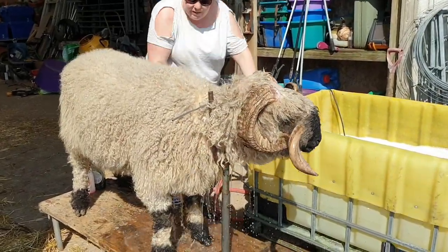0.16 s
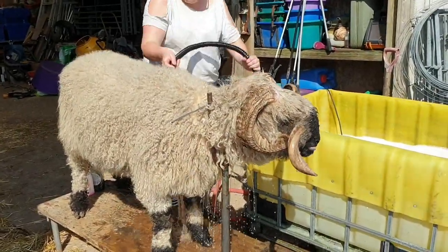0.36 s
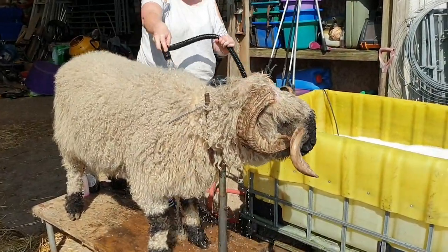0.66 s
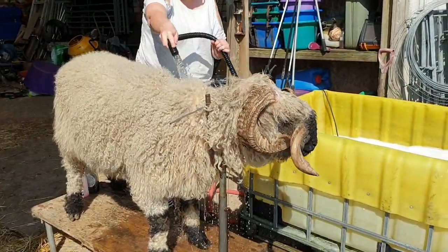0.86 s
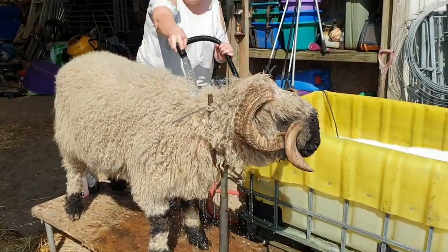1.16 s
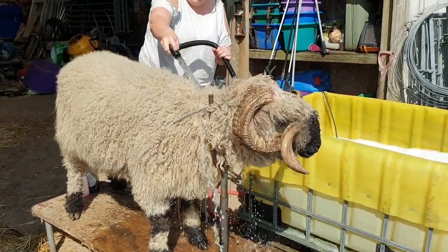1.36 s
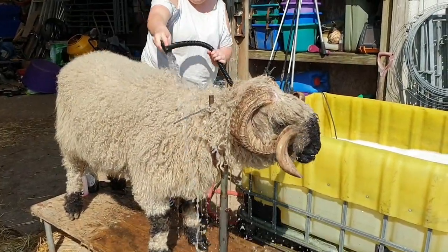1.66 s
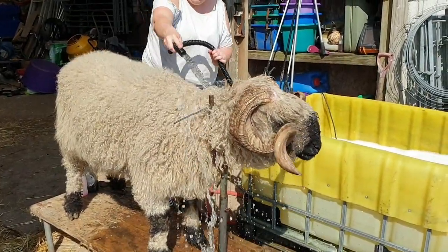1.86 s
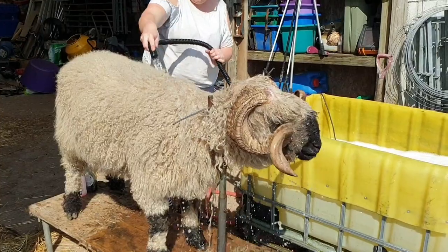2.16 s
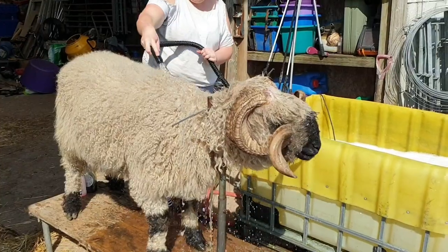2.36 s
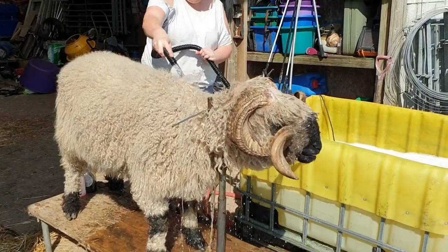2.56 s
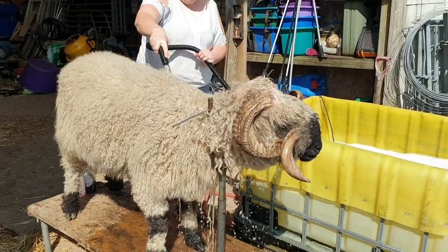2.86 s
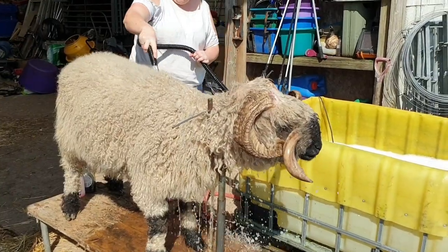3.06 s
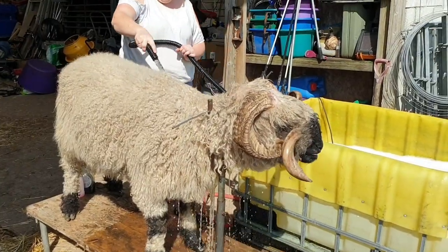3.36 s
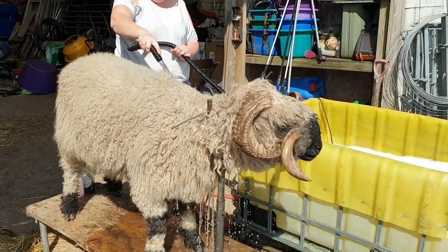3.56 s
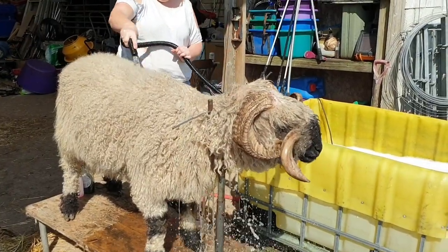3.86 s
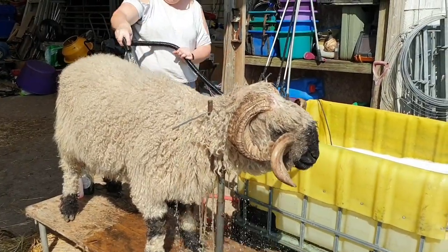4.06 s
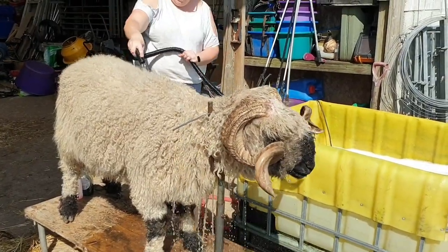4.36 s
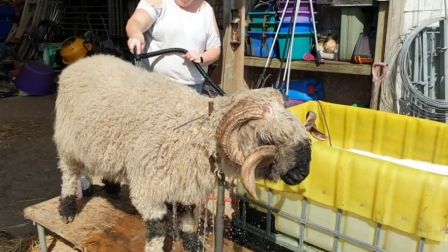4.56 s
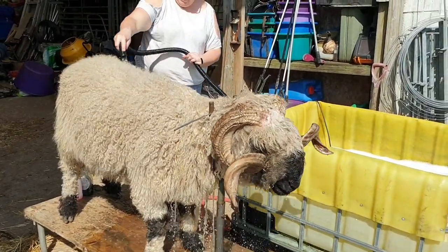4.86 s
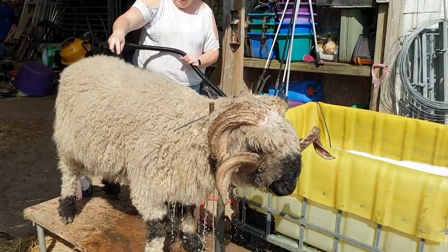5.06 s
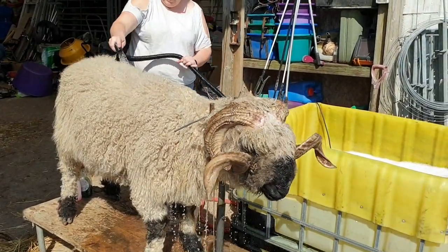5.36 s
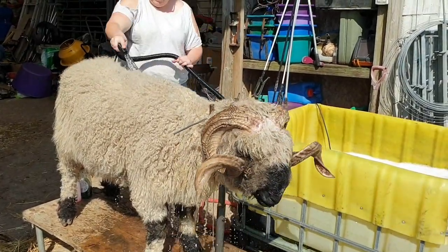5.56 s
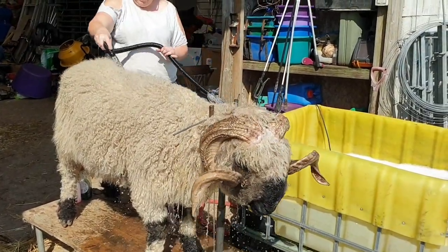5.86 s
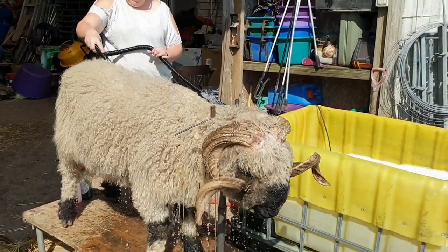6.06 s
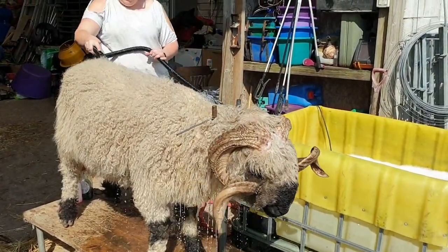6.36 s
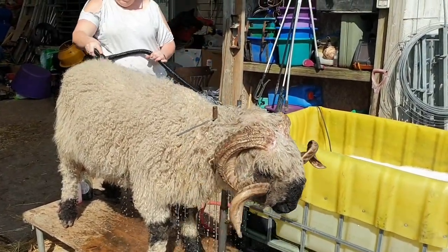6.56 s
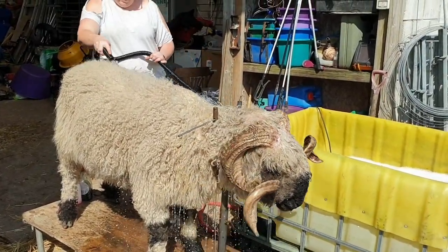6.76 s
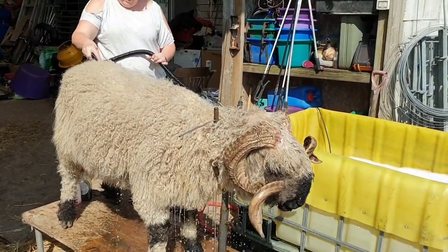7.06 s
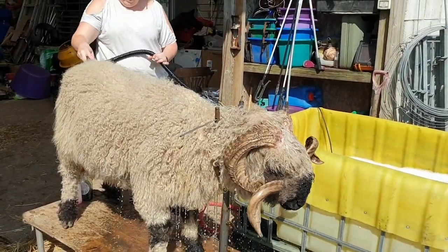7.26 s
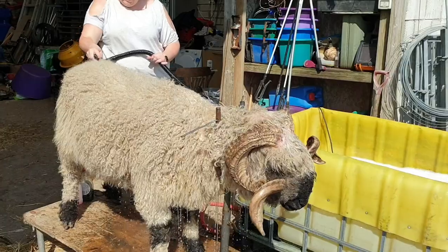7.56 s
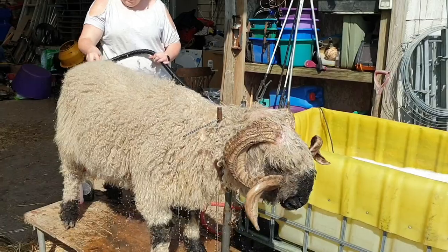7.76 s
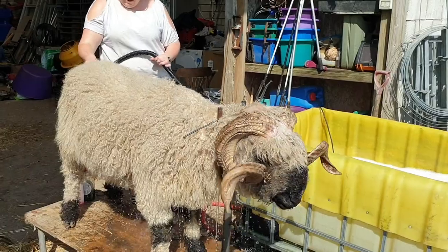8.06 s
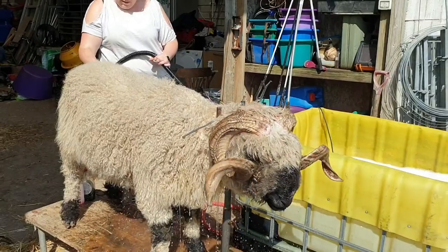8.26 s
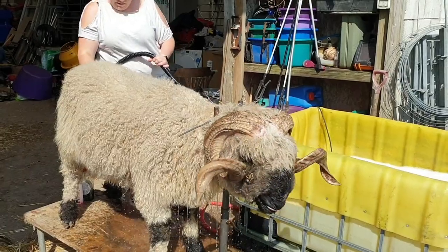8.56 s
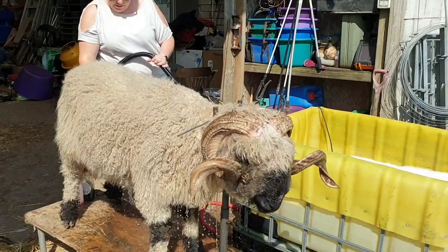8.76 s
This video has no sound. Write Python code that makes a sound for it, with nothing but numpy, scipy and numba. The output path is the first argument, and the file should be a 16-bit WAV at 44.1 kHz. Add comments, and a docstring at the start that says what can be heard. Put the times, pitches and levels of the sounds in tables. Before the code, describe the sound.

Outdoors in a farmyard, hose water drains from a sheep's wet fleece onto a wooden stand and the ground. From 0 s there is a constant, irregular patter of tiny bright drops, with crisp clicks, short upward bubble chirps and a soft fine hiss beneath. A stronger splat lands near 0.4 s; a heavy slap at 1.7 s begins a dense cluster of splashes lasting to about 2.5 s. It thins, then swells again from 3.7 to 4.1 s, with a sharp smack near 4.55 s. Dribbling continues, sparser around 6 to 6.7 s, busier at 7 to 7.4 s and around 8.1 s. Dull low plops hit the boards throughout. Low wind thumps buffet the microphone from about 5 to 6.4 s and hardest from 7.5 to 8.1 s, then drop to small bumps. Nearby walls add brief reflections; a faint dull distant murmur remains to 9 s.

```python
"""Hose water falling from wet wool

Water runs off wet wool and falls in clumps on a wooden table and the ground, in a yard.
Drops sound as short bubble tones that chirp upward; clumps slap, chirp low or click near 5 kHz, and spatter.
A fine spray hisses beneath, as filtered noise, and near walls answer the drops with short noise tails.
Wind noise buffets the two microphone ports separately, over a dull far-off yard murmur."""
import sys
import numpy as np
from scipy import signal
from scipy.fft import rfft, irfft, next_fast_len
from scipy.io import wavfile
from scipy.ndimage import uniform_filter1d, map_coordinates
from numba import njit

SR = 44100
rng = np.random.default_rng(int(sys.argv[2]) if len(sys.argv) > 2 else 0)


def transcribe(u):
    """Save the signal u as a 16-bit wav file named by the first command-line argument.

    u: samples, shape (n,) or (channels, n), limited to [-1, 1]; the rate is SR.
    q: integer samples, one column per channel.
    """
    v = np.clip(np.atleast_2d(u).T, -1, 1)
    q = np.round(v * 32767).astype(np.int16)
    wavfile.write(sys.argv[1], SR, q)


def ratio(d):
    """dB to gain"""
    e = np.asarray(d, float) / 20
    return 10 ** e


N = 393358


def unit(x):
    """Power normalisation: scales a signal to rms 1."""
    return x / np.sqrt(np.mean(x ** 2) + 1e-20)


def along(points, hz):
    """Logarithmic frequency scale: interpolates (frequency [Hz], value) points along it."""
    f, v = np.transpose(points)
    return np.interp(np.log(hz + 1), np.log(f + 1), v)


def curves(rows):
    """Piecewise-linear envelopes: one value per sample for each column after the time."""
    s, *columns = np.transpose(rows)
    time_s = np.arange(N) / SR
    return [np.interp(time_s, s, column) for column in columns]


def wobble(rate):
    """Slow random modulation: a smooth curve through random knots, rate of them a second."""
    knots = rng.standard_normal(int(N * rate / SR) + 4)
    return map_coordinates(knots, [np.arange(N) * rate / SR])


def sides(pan_db):
    """Level difference between channels: left and right gains, split evenly."""
    return ratio(np.array([pan_db, -pan_db]) / 2)


def coloured(x, spectrum):
    """Minimum-phase filtering: the cepstrum is folded to make the spectrum causal."""
    m = 2 * next_fast_len(N // 2 + 4096)
    gain = ratio(along(spectrum, np.fft.rfftfreq(m, 1 / SR)))
    cepstrum = irfft(np.log(gain + 1e-6), m)
    cepstrum[1:m // 2] *= 2
    cepstrum[m // 2 + 1:] = 0
    return irfft(rfft(x, m) * np.exp(rfft(cepstrum)), m)[..., :N]


def rush(spectrum, alike, patchy_db):
    """Partly coherent noise: stereo, rms 1, with random gain patches in time and frequency."""
    z = signal.stft(rng.standard_normal((2, N + 512)), nperseg=256)[2]
    patches = uniform_filter1d(rng.standard_normal(z.shape[1:]), size=5, axis=0)
    patches = uniform_filter1d(patches, size=6, axis=1)
    noise = signal.istft(z * ratio(patchy_db * unit(patches)), nperseg=256)[1]
    pair = rfft(noise[:, :N])
    # The mid-side mixing angle sets the likeness of left and right
    angle = np.arccos(np.clip(along(alike, np.fft.rfftfreq(N, 1 / SR)), -1, 1)) / 2
    mid, side = irfft(pair * [np.cos(angle), np.sin(angle)], N)
    return unit(coloured(np.array([mid + side, mid - side]), spectrum))


@njit
def add(out, start, hz, gain, cycles, rise, soft, rate):
    """Damped resonance: short tones that glide upward by their share of rise and stop fast."""
    for g in range(len(start)):
        life = cycles[g] / hz[g]
        first = int(start[g] * rate) + 1
        for n in range(max(first, 0), min(first + int(2.5 * life * rate), len(out))):
            t = n / rate - start[g]
            turns = hz[g] * t * (1 + rise[g] * (t / life / 2 - .5))
            onset = 1 - np.exp(-t * hz[g] / soft)
            out[n] += gain[g] * np.sin(2 * np.pi * turns) * np.exp(-(t / life) ** 2) * onset


def tones(s, hz, db, cycles, rise, pan_db, spread_s):
    """Arrival-time difference: each tone has its own spot, so its own lag between ports, leaning left."""
    out = np.zeros((2, N))
    lag_s = -.00003 + spread_s * rng.uniform(-1.06, 1, len(s))
    for ear, sign in enumerate((1, -1)):
        gain = ratio(db + sign * pan_db / 2)
        add(out[ear], s + sign * lag_s / 2, hz, gain, cycles + 0 * s, rise + 0 * s, 1.3, float(SR))
    return out


# Murmur of the yard: (time [s], relative level [dB])
MURMUR_LEVEL = [(0.0, -53.5), (0.82, -56), (1.19, -53), (1.44, -55), (1.89, -55), (2.53, -57),
                (2.75, -57.5), (3.0, -55.5), (3.18, -53.5), (3.55, -59), (3.77, -56), (3.97, -51.5),
                (4.22, -55.5), (4.47, -55.5), (4.89, -55.5), (6.36, -57), (7.35, -53.5), (7.45, -55.5),
                (7.85, -54), (8.37, -59), (8.6, -59), (8.77, -55.5), (8.92, -56.5)]
# Murmur spectrum: (frequency [Hz], relative level per hertz [dB])
MURMUR_COLOUR = [(35, -22), (60, -21), (101, -5), (179, -8.5), (290, 2), (380, -7.5), (440, -9.5), (642, 2),
                 (949, -10), (1370, -16), (1500, -12), (1950, -34), (3300, -120)]
# Left-right likeness of murmur, wall tails and spray: (frequency [Hz], coherence [-1 to 1])
LIKENESS = [(60, 0.92), (150, 1), (380, 1), (950, 0.63), (2380, -0.23), (5980, -0.31), (15000, -0.14)]


def murmur():
    """Coherence of distant sources: far traffic and leaves, nearly the same at both ports in the bass."""
    level_db, = curves(MURMUR_LEVEL)
    drift_db = 0.37 * wobble(4)
    return ratio(level_db + 2.0 + drift_db) * rush(MURMUR_COLOUR, LIKENESS, patchy_db=2.0)


# Wind at the ports:
# (time [s], relative buffet level [dB], relative upper flutter level over buffet [dB], left-right [dB])
GUSTS = [(0.0, -67, 8, -9.0), (0.07, -62, 1, 0.0), (0.22, -57, 3, -1), (0.25, -48, -1, 2),
         (0.42, -60.5, 7, 2), (0.79, -51, -6, 3.5), (0.89, -64, 5.5, -1.5), (1.32, -63, 4, 1.0),
         (1.84, -62, -2, -16), (1.94, -68, 6, -3), (2.06, -58, -11, -18), (2.13, -66, 5, -15.0),
         (2.21, -47, -17.5, 1), (2.26, -61, -3, -16.0), (2.31, -56, -6, -16.0), (2.38, -48, -11.5, 3),
         (2.53, -51.5, -7, 0), (2.68, -64, 1.5, 12.5), (2.8, -62, 1, -11.0), (3.15, -55, -4, 3),
         (3.75, -64, 3, 0), (4.22, -61, 8, 1), (4.27, -63.5, 1, -15.5), (4.47, -62.5, 2, 14),
         (4.65, -73, 5, -18), (4.72, -46.5, -6, -17), (4.77, -49, -9, -24), (4.82, -60, -1, -25),
         (4.87, -52, -13, -2), (4.99, -52, 10, 6), (5.04, -58, -9, -16.0), (5.09, -44, 1, 1),
         (5.17, -45, -4, -2), (5.34, -33.5, -20, 2), (5.39, -53, -9.5, -9), (5.49, -45, -10, -3.0),
         (5.51, -38, -18, 2), (5.56, -41.5, -10, 2), (5.61, -53, -8, -19), (5.66, -49, -14.5, -14.0),
         (5.71, -49.5, 2, -3), (5.76, -37, -13, -4.0), (5.81, -51, 2, 2.5), (5.84, -34, -18, -3.5),
         (5.94, -42, -4, -0.5), (5.96, -47, -4, -5.5), (6.01, -31, -12, -5), (6.06, -50, -1, 1.0),
         (6.11, -37, -7, -4), (6.21, -42, -13, 7), (6.23, -42.5, -13, -3), (6.31, -44, -10, -1.0),
         (6.36, -53.5, -8, -13.0), (6.41, -36.5, -12, 0.5), (6.48, -65, 7, -4), (6.53, -58, -1, -16),
         (6.63, -64.5, 3, -14), (6.78, -56, 4, 1), (6.86, -64, -3, -28.0), (6.95, -42, -14, -1),
         (6.98, -50, -7, 1), (7.05, -42, -10, -2), (7.18, -59, -2.5, -19), (7.23, -51, 3, 0.5),
         (7.33, -47.5, -5, 5.0), (7.43, -53, -3, -25), (7.45, -42, -5, -0.5), (7.5, -41.5, -6, 1),
         (7.53, -24, -17, -1), (7.57, -44, -7, -3), (7.62, -31, -18, 14), (7.67, -31.5, 1, 3),
         (7.7, -35, -9, -9.0), (7.77, -36.5, -17, -7), (7.8, -39, -15, -3), (7.87, -28, -16, 7),
         (7.9, -29, -8, 5), (7.95, -27.5, -9, 12), (8.0, -31, -12, 1), (8.05, -34.5, -23, 22),
         (8.1, -34, -3, 25.0), (8.12, -68, -2, 1), (8.17, -60, -2, -11), (8.52, -66, -11, -20.5),
         (8.6, -47, 2, -4.5), (8.64, -44, -7, -11.5), (8.69, -62, -9, -28.0), (8.74, -71, 3, -20.5),
         (8.82, -40, -16, 1.5), (8.87, -55, -10, -22), (8.92, -44.5, -8, -4.5)]
# Buffet spectrum: (frequency [Hz], relative level per hertz [dB])
BUFFET_COLOUR = [(12, -65), (20, -7), (53, 1), (70, 1), (103, -1.5), (151, -12), (250, -18.5), (320, -53),
                 (550, -120)]
# Flutter spectrum: (frequency [Hz], relative level per hertz [dB])
FLUTTER_COLOUR = [(76, -25.5), (130, -6.5), (182, -5.5), (290, -10), (551, -25.5), (700, -26), (910, -22),
                  (1540, -120)]
# Single eddies striking a port: (time [s], relative level [dB], frequency [Hz], left-right [dB])
EDDIES = [(4.726, -42, 104, -26.5), (5.229, -33, 61.9, -5), (5.282, -35, 64.6, -1.0), (5.329, -34, 88.8, 4),
          (5.501, -26, 61.9, 4), (5.544, -36, 61.9, 1.5), (5.733, -27, 67.3, -3.5), (5.799, -32, 188, 4),
          (5.831, -36, 107, -3.0), (5.986, -22.5, 91.5, -4.0), (6.109, -33, 127, 2),
          (6.159, -31.5, 113, 1.0), (6.189, -30, 61.9, 3.5), (6.382, -30, 61.9, -2.5),
          (7.016, -31, 61.9, -2), (7.464, -29, 86.1, 2.5), (7.515, -23, 61.9, 5), (7.584, -34, 61.9, 6),
          (7.61, -17, 61.9, 17.5), (7.658, -26, 178, 1), (7.874, -22, 64.6, 4.5), (7.939, -29, 80.7, 11.0),
          (7.974, -24, 61.9, 4.5), (8.024, -26, 67.3, 20.5), (8.079, -23, 80.7, 25)]


def wind():
    """Turbulent pressure: eddies roll over each port separately; strong ones flutter, single ones thump."""
    buffet_db, flutter_db, pan_db = curves(GUSTS)
    low = rush(BUFFET_COLOUR, [(30, 0.3)], patchy_db=2.0)
    low_power = np.abs(uniform_filter1d(low ** 2, size=2500, axis=1))
    buffet = unit(low / (low_power + .05) ** 0.41)  # evens out the swings in loudness
    flutter = unit(np.abs(buffet) ** 1.45 * rush(FLUTTER_COLOUR, [(30, 0.093)], patchy_db=3.5))
    s, db, hz, side_db = np.transpose(EDDIES)
    # About one pressure cycle each, with a wide lag between the ports
    thumps = tones(s, hz, db + 5.0, 1.0, 0.16, side_db, spread_s=0.0078)
    return thumps + sides(pan_db) * ratio(buffet_db + 0.65) * (buffet + ratio(flutter_db - 4.0) * flutter)


# Decay of the shed front and tank side: (frequency [Hz], time to fall 60 dB [s])
WALL_DECAY = [(300, 0.15), (2000, 0.12), (5000, 0.05), (12000, 0.068)]


def yard_walls(x, size=SR // 4):
    """Reverberation: near walls add a short noise tail, redrawn each quarter second so no ringing builds up."""
    out = np.pad(x, ((0, 0), (0, 2 * size)))
    delay = 80  # samples
    for start in range(0, N, size):
        hz, t, z = signal.stft(rng.standard_normal((2, size)), SR, nperseg=128)
        angle = np.arccos(np.clip(along(LIKENESS, hz), -1, 1))[:, None] / 2
        decay = ratio(-60 * t / along(WALL_DECAY, hz)[:, None])
        mid, side = z * [np.cos(angle), np.sin(angle)] * decay
        tail = signal.istft(np.array([mid + side, mid - side]), SR, nperseg=128)[1][:, :size - delay]
        tail = tail / np.linalg.norm(tail[0])
        answer = signal.fftconvolve(x[:, start:start + size], tail, axes=1)
        out[:, start + delay:][:, :answer.shape[1]] += ratio(-7.0) * answer
    return out[:, :N]


# Fine spray: (time [s], relative level [dB])
SPRAY_LEVEL = [(0.0, -46), (0.4, -48), (0.79, -45), (1.07, -48.5), (1.54, -49.5), (1.84, -46.5),
               (1.91, -55), (2.16, -46), (2.78, -52.5), (2.95, -52), (3.18, -42.5), (3.38, -49),
               (3.58, -56.5), (3.75, -42), (3.87, -39), (3.95, -40.5), (4.12, -44.5), (4.37, -48),
               (4.84, -44.5), (5.14, -47), (5.29, -50.5), (5.54, -44.5), (5.89, -51), (6.16, -46),
               (6.51, -48), (6.93, -48), (7.28, -42), (7.43, -45.5), (7.65, -45), (7.8, -43.5), (8.05, -42),
               (8.3, -47.5), (8.55, -45.5), (8.77, -47.5), (8.92, -41)]
# Spray spectrum: (frequency [Hz], relative level per hertz [dB])
SPRAY_COLOUR = [(530, -28), (900, -18.5), (1370, -19.5), (1570, -10), (2300, -7.5), (2860, -8), (3510, -14),
                (5350, 4), (5750, 0.5), (6330, -19.5), (8550, -7), (9650, -15.5), (11400, -9), (14900, -18),
                (16000, -26)]


def spray(water):
    """Noise of countless droplets: a fine hiss of mist, swelling a little with every clump that lands."""
    level_db, = curves(SPRAY_LEVEL)
    power = np.sum(water ** 2, axis=0)
    brief = np.abs(uniform_filter1d(power, size=500)) + 1e-7
    usual = np.abs(uniform_filter1d(power, size=12000)) + 1e-7
    swell = (brief / usual) ** 0.096
    return ratio(level_db + 7.5 + 0.68 * wobble(24)) * swell * rush(SPRAY_COLOUR, LIKENESS, patchy_db=2.5)


# Colour of table, yard and microphone on the water: (frequency [Hz], gain [dB])
WATER_COLOUR = [(530, -25), (900, -20), (1230, -9), (1390, -15), (2220, -7), (2860, -7), (3150, -10),
                (3550, -11), (5280, -4), (6410, -16.5), (8550, -12), (9650, -17), (11400, -13.5),
                (14900, -27), (16000, -32)]


def swarm(s, hz, db, pan_db, count, over_s, octaves, cycles):
    """Drop fragmentation: each shatters into count bubbles that crowd in, then thin out and weaken."""
    shape = (len(s), count)
    delay, n, u = rng.gamma(1.6, size=shape), rng.standard_normal(shape), rng.random(shape)
    start_s = s[:, None] + over_s * delay
    pitch = np.clip(hz[:, None] * 2 ** (octaves * n), 400, 15500)
    # Higher tones are shorter; level rises with pitch to keep the swarm's spectrum flat
    level_db = db[:, None] - 2.1 * delay - 7 * u + 20 * np.log10(pitch / hz.mean())
    rows = (start_s, pitch, level_db, cycles * (.5 + u), 0.07 + 0 * u, pan_db[:, None] + 2.4 * n)
    return coloured(tones(*[r.ravel() for r in rows], spread_s=.00011), WATER_COLOUR)


# Heavy drops on the table: (time [s], relative level [dB], frequency [Hz],
# ringing life [cycles], slap level over that level [dB])
HEAVY_DROPS = [(0.248, -37.5, 720, 2.4, -17), (0.502, -31, 487, 2.8, -9), (0.925, -32, 1440, 4.4, -11),
               (0.954, -31.5, 1230, 2.9, -2.5), (1.018, -36.5, 298, 1.7, -1.5), (1.315, -37, 643, 1.9, -3),
               (1.463, -37.5, 1310, 2.4, -7), (1.833, -29.5, 1260, 2.4, -5), (1.912, -34, 376, 2.7, -11),
               (1.968, -40, 390, 2.6, -9), (2.031, -34, 1270, 2.9, 1), (2.101, -30.5, 1490, 4.5, -11),
               (2.81, -44, 680, 2.4, 1), (2.845, -33.5, 1310, 3.3, -4), (2.869, -47, 716, 2, 8),
               (3.038, -38, 780, 2.8, -5), (3.836, -31, 1470, 3.2, -5), (3.899, -39, 623, 2.4, -5),
               (4.646, -38, 674, 2.1, -5), (4.93, -33.5, 560, 2.1, -5), (5.562, -33, 670, 2.1, -1),
               (5.6, -36, 657, 2.1, -1), (6.507, -35.5, 1250, 3.2, -4), (6.745, -38, 1050, 2.9, -8),
               (6.915, -33.5, 729, 1.9, -4), (7.038, -38, 694, 2, 0), (7.709, -33, 1130, 2.4, -4),
               (7.906, -32, 670, 2.5, -0.5), (8.13, -35, 1200, 2.6, -6), (8.343, -40, 1210, 3, -5)]
# Slap spectrum of the wet boards: (frequency [Hz], relative level per hertz [dB])
BOARD_COLOUR = [(120, -17), (250, -10.5), (600, 2), (1500, 1), (2500, 5.5), (5000, -71)]


def plops():
    """Bubble resonance and impact: heavy drops give a low, short gulp and a dull slap on the boards."""
    s, db, hz, cycles, slap_db = np.transpose(HEAVY_DROPS)
    gulp = tones(s, hz, db + 3.0, np.clip(cycles, .3, 12), 0.022, 0 * s, spread_s=.0001)
    envelope, t = np.zeros(N + SR), np.arange(SR // 4) / SR
    for when, level_db in zip(s, db + slap_db):
        decay = ratio(level_db - 60 * t / 0.06)  # falls 60 dB in 0.06 s
        envelope[round(when * SR):][:len(t)] += decay * (1 - np.exp(-t / 0.0014))
    slap = envelope[:N] * unit(coloured(rng.standard_normal(N), BOARD_COLOUR))
    return gulp + slap


def patter(level_db, clumps_db, count, centre_hz, octaves, cycles, size_db, denser):
    """Random arrivals in clumps: more flow is partly more drops (share denser), partly bigger ones."""
    arrivals = np.cumsum(ratio(2 * denser * level_db + clumps_db))
    u, e, n = rng.random(count), rng.exponential(size=count), rng.standard_normal((count, 2))
    s = np.interp(u * arrivals[-1], arrivals, np.arange(N) / SR)
    hz = centre_hz * 2 ** (octaves * n[:, 0])
    drop_db = size_db * np.minimum(e, 3.2)
    drops = swarm(s, hz, drop_db, 1.5 * n[:, 1], count=3, over_s=.002, octaves=0.3506, cycles=cycles)
    # Undo the loudness that density alone brings, then set the level
    return ratio(level_db) * unit(drops * ratio(-denser * level_db))


# Run-off: (time [s], relative level of fine drops [dB], relative level of big drops [dB], left-right [dB])
RUNOFF_FLOW = [(0.0, -42, -46, 1), (0.4, -42, -50, 10), (0.94, -42, -47, 0.5), (1.24, -44, -50, 3),
               (1.51, -44, -52, 0.5), (1.69, -43, -50, 13), (1.79, -41, -45, 2), (2.06, -42, -46, 0.5),
               (2.23, -42, -50, 3), (2.36, -41, -52, 0), (2.43, -43, -52, 5), (2.48, -43, -52, 4),
               (2.68, -47, -54, 1.0), (2.88, -48, -54, 4), (3.0, -44, -48, -7), (3.13, -40, -47, 3.5),
               (3.23, -40, -48, 4), (3.38, -45, -53, 1.5), (3.58, -47, -53, 0.5), (3.7, -46, -51, 2.0),
               (3.75, -46, -51, 15), (3.87, -37, -43, 3), (3.97, -36, -42, 4), (4.15, -43, -49, 2.5),
               (4.37, -43, -50, 0.0), (4.55, -42, -48, 2), (4.77, -40, -47, 1), (4.94, -40, -47, 1.5),
               (5.12, -43, -51, 2.5), (5.32, -42, -51, 2.5), (5.54, -40, -44, 3), (5.71, -41, -49, -1),
               (6.06, -43, -50, 4.5), (6.61, -45, -51, 3), (6.81, -43, -50, 0), (6.98, -40, -49, 0.5),
               (7.28, -50.5, -43, 13.5), (7.43, -41, -47, 2.0), (7.53, -41, -48, -4),
               (7.62, -54.5, -48, 17), (8.05, -37, -46, 4.0), (8.12, -41, -46.5, 3), (8.22, -42, -49, 12),
               (8.35, -43, -50, -2), (8.52, -45.5, -50, 1.0), (8.74, -40, -49, -3), (8.92, -39, -43, 1)]


def runoff():
    """Jet break-up: streams from the wool part unevenly; fine and big drops land in the same clumps."""
    fine_db, big_db, pan_db = curves(RUNOFF_FLOW)
    clumps_db = 6 * np.clip(.6 * wobble(25) + wobble(70), -2.5, 1.8)
    fine = patter(fine_db + 1.5, clumps_db, count=6000, centre_hz=6500, octaves=.65,
                  cycles=9, size_db=3.5, denser=.3)
    big = patter(big_db + 1.5, clumps_db, count=1500, centre_hz=2200, octaves=.5,
                 cycles=6.5, size_db=4, denser=.3)
    return sides(pan_db) * (fine + big)


# Clumps landing: (time [s], relative level [dB], ringing frequency [Hz],
# relative spatter level over that level [dB], left-right [dB])
CLUMPS = [(0.1004, -24, 2720, -5, -4), (0.193, -33, 5010, -14, -1), (0.2917, -28.5, 4700, -11, 0.5),
          (0.3895, -17.5, 5100, -11, -1), (0.5208, -28.5, 4650, -11, 1.5), (0.8719, -20.5, 2490, -9, -3),
          (0.9007, -29, 5400, -17, 11), (0.9266, -22.5, 1800, -14, 3), (0.9817, -24, 5000, -10, 1.0),
          (1.0182, -22, 4700, -14, 0), (1.1189, -24, 2880, -16, 7), (1.1615, -29.5, 5410, -11, -3),
          (1.2101, -26.5, 4820, -12, 1.5), (1.306, -28, 2310, -12.5, 0.0), (1.4346, -27.5, 4900, -6, -1),
          (1.493, -20, 5060, -9, 1), (1.6012, -26, 2830, -3, 0.5), (1.6217, -24, 2480, 4, 0.5),
          (1.6427, -19.5, 5360, -4, -2), (1.6829, -7, 2230, -10, 1.5), (1.7068, -15.5, 2410, -1.5, -1),
          (1.7735, -27.5, 5590, -12, 2.5), (1.848, -20.5, 5400, -6.5, 0.0), (1.868, -22, 5200, -13, 2.0),
          (1.919, -28.5, 3060, -1, -1), (1.933, -20, 2430, -7, 1), (1.976, -17.5, 5470, -11.5, -2),
          (2.0287, -37, 2400, -9.5, -2.5), (2.1208, -18, 5250, -13, 1.5), (2.143, -12.5, 1940, -4, 0.0),
          (2.171, -14.5, 2730, -7, 0.5), (2.1972, -23, 2460, -5.5, 0.5), (2.2643, -30.5, 2550, -15, -2),
          (2.291, -27, 4660, -17, 2.0), (2.375, -18, 4940, -18, 1), (2.4168, -16.5, 2460, -19, -2),
          (2.5012, -18.5, 4730, -5.5, 1), (2.5465, -24.5, 4780, -5, 0), (2.673, -26.5, 5290, -16, 0.5),
          (2.7263, -33.5, 5370, -20, 5.5), (2.947, -28, 5140, -24, 1.0), (2.9728, -23.5, 5040, -2.5, 3),
          (2.9983, -18, 5180, -3, 4.5), (3.051, -22.5, 5250, -18, 5), (3.1172, -21, 4600, -16, 5),
          (3.162, -20.5, 2650, -3, -1), (3.2431, -22, 5370, -1.5, 0), (3.3169, -35, 5310, -3, 2.0),
          (3.3316, -20, 4900, -5.5, 0.5), (3.5306, -29, 2200, -4.5, 0.0), (3.6876, -28, 2680, -14, 1.5),
          (3.701, -20.5, 5170, -7, 4), (3.761, -15.5, 2260, -10.5, -3), (3.8032, -15.5, 4900, -5, -1),
          (3.8356, -21, 2630, 0.5, 2), (3.8611, -15.5, 5000, -11, 1.5), (3.8975, -34, 5510, -4.5, 1.0),
          (3.9105, -16.5, 4970, -6.5, -1), (3.9709, -23, 5560, -10, 4), (4.0372, -15, 4930, -5, 0),
          (4.1128, -20.5, 5200, -7, -2), (4.156, -23, 5030, -15, 1.0), (4.3755, -21.5, 2580, -9.5, -1),
          (4.4737, -28, 5400, -9, 1.5), (4.557, -8.5, 5680, -8.5, -0.5), (4.697, -23.5, 5400, -10, 1.0),
          (4.7405, -24, 4970, -1.5, 2), (4.778, -16.5, 2620, -5, 1), (4.8878, -23, 4870, -13, 1.5),
          (4.9222, -25, 4800, -6, 1.0), (4.9438, -24, 5400, -9, 0.5), (5.0133, -23, 5000, -6, -1),
          (5.1706, -24.5, 5250, -5, 0.5), (5.3086, -29, 5160, -11, 0.5), (5.349, -18.5, 2140, -12, 0),
          (5.3952, -21, 5320, -8, 1.0), (5.4165, -27, 4950, -8.5, 2.0), (5.451, -23.5, 4950, -6, -2),
          (5.6034, -25.5, 2960, -23, 1.0), (5.6855, -24.5, 4850, -8.5, 3.0), (5.6976, -19, 4900, -15, 1.0),
          (5.7495, -29, 5200, -24, -1), (5.8673, -24, 4950, -17, -2), (6.0564, -18.5, 2600, -4.5, 1.0),
          (6.2503, -22, 2920, -7, 2), (6.5757, -30, 5200, -10, -2.5), (6.6476, -24, 2500, -20, -4),
          (6.7204, -28.5, 2650, -9, -2), (6.795, -21.5, 4860, -14, 7), (6.8815, -22, 4540, -21, 4),
          (6.9067, -26, 4300, -14, 1.0), (6.927, -25.5, 5200, -9, 4), (6.9586, -26, 2420, -3, 1.0),
          (6.983, -22.5, 5360, -18, 6), (7.0289, -20.5, 5050, -2.5, -1), (7.112, -14.5, 2410, -11, -0.5),
          (7.229, -21, 2560, -5, -2), (7.2937, -25.5, 5300, -4, -2), (7.3437, -22.5, 5340, 0, 1.0),
          (7.38, -19, 2260, 0, 2), (7.3928, -13, 5300, -5, 2.5), (7.5028, -33, 5330, -19, 1.0),
          (7.53, -31, 4700, -21, 0.5), (7.7588, -26.5, 4870, -11.5, 1), (7.788, -26, 5300, -7, 7),
          (7.8598, -24, 4900, -3, 9), (7.8945, -23.5, 4940, -12, 6), (7.9857, -24, 3900, -10, 5.0),
          (8.0292, -25, 4760, -17, 9), (8.0711, -25.5, 4780, -11, 2), (8.0898, -21.5, 5300, -2, 2),
          (8.1194, -25.5, 5220, -4, 0.0), (8.1339, -18.5, 5420, -3, 0.0), (8.166, -18, 4970, -13, -2),
          (8.1862, -20, 2340, -4, -1.5), (8.402, -26, 5200, -10, 0), (8.498, -26, 5300, -9.5, 0.5),
          (8.549, -21.5, 5100, -5.5, 1.5), (8.6712, -22.5, 5330, -7.5, 2.5), (8.6844, -20.5, 5270, -12, 6),
          (8.758, -23.5, 2320, -5, 1.0), (8.7855, -18, 1810, -5, 1), (8.8595, -25.5, 5170, -6, -2),
          (8.9017, -29, 4730, -11, 4)]


def splats():
    """Impact excitation: clumps slap down and spatter; low ones chirp like a bubble,
    those near 5 kHz are clicks ringing the microphone."""
    s, db, hz, spatter_db, pan_db = np.transpose(CLUMPS)
    rise = 0.48 * (2000 / hz) ** 2  # low ones glide upward; near 5 kHz the pitch stays almost steady
    ring = tones(s, hz, db, 2.6 + hz / 700, rise, pan_db, spread_s=.00006)
    over_s = .006 * ratio(.3 * (db + 22))[:, None]  # bigger clumps spatter longer
    spatter = swarm(s, 5500 + 0 * s, db + spatter_db + 16, pan_db, count=16, over_s=over_s,
                    octaves=0.847, cycles=5.4)
    return ring + spatter


def scene():
    """Superposition: water with its wall tails, spray, wind and yard add up."""
    water = yard_walls(runoff() + splats() + plops())
    return water + spray(water) + wind() + murmur()


def top_cut(x):
    """Nothing passes above the cut-off."""
    return signal.sosfilt(signal.butter(12, 16210, fs=SR, output="sos"), x)


# Difference between the microphone ports: (frequency [Hz], left-right [dB])
PORT_COLOUR = [(60, -3), (180, 0.5), (550, 2), (1650, -1), (4970, 1), (15000, -3.5)]


def record(dry):
    """Transducer response: the ports differ a little in colour and drop the deepest bass."""
    hz = np.fft.rfftfreq(N, 1 / SR)
    bass_cut = 1 / (1 + (32 / (hz + 1)) ** 4)
    mix = irfft(rfft(dry) * sides(along(PORT_COLOUR, hz)) * bass_cut, N)
    return top_cut(mix)


dry = scene()
out = record(dry)
transcribe(out)
```